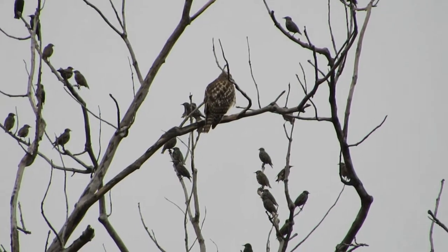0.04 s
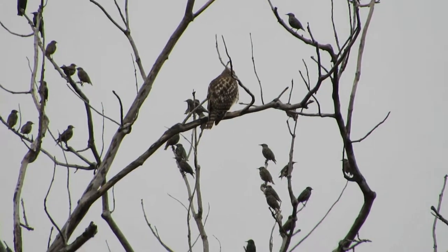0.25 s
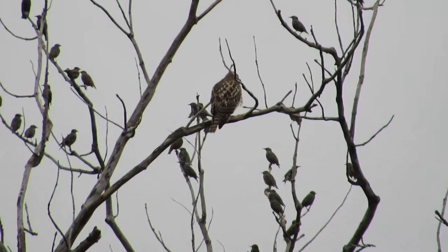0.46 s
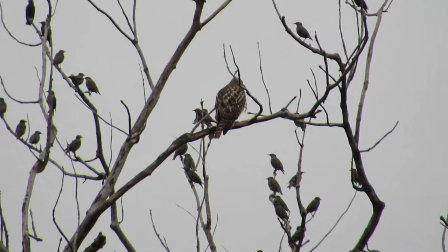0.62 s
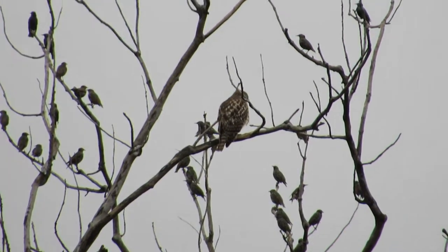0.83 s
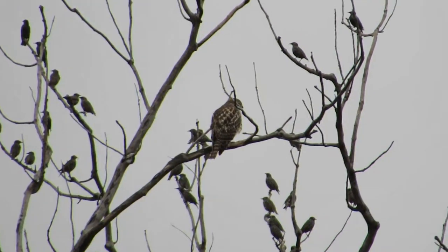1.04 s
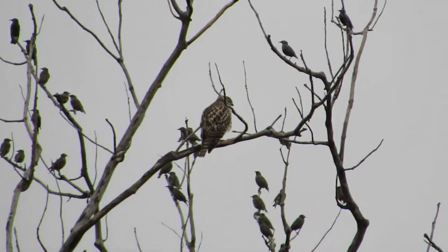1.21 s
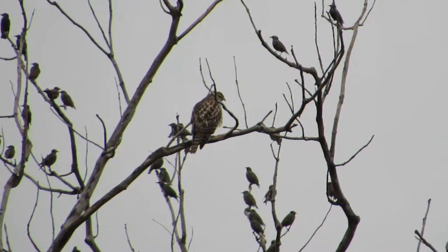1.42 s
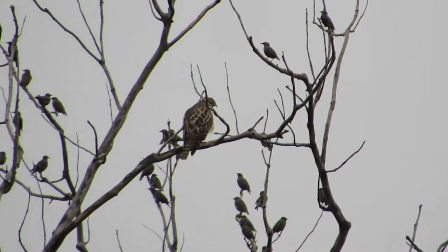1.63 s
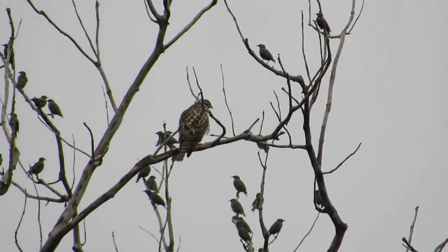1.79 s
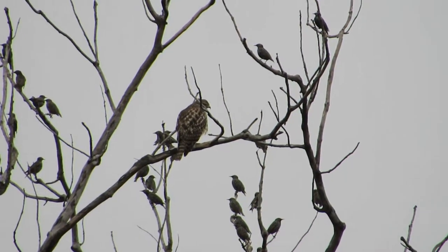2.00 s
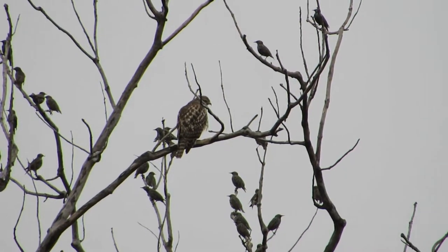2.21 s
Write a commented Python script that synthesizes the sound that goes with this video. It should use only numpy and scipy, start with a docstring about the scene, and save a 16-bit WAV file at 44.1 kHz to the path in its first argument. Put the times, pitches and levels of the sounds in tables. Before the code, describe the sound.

A hawk screams once, hoarse and falling in pitch, from a bare tree outdoors. Before the call, a louder gust of wind rumbles and thumps on the microphone, then dies down. A soft hiss runs underneath.

```python
"""A hawk's scream after a gust

Over a steady outdoor hiss and faint tones, a gust buffets the microphone, driving the two channels in
opposite directions; a limiter ducks the hiss and lets it slowly back up. A small bird peeps once.
Then a hawk in a bare tree gives one hoarse scream, a harmonic tone that leaps up, holds, sags and
breaks into squeaks. The trees scatter it back, and a faint tick follows."""
import sys
import numpy as np
from scipy import signal
from scipy.io import wavfile
from scipy.ndimage import uniform_filter1d

SR = 44100
rng = np.random.default_rng(int(sys.argv[2]) if len(sys.argv) > 2 else 0)


def master_out(mix):
    """Clip the mix to full scale and print it as 16-bit PCM to the path in sys.argv[1]."""
    frames = np.transpose(np.atleast_2d(mix))
    ceiling = np.clip(frames, -1, 1)
    pcm = np.round(ceiling * 32767).astype(np.int16)
    wavfile.write(sys.argv[1], SR, pcm)


N = 103635
TIME = np.arange(N) / SR


def from_db(db):
    """Amplitude grows tenfold for every 20 dB."""
    return 10 ** (np.asarray(db) / 20)


def unit_rms(x):
    """Dividing by the root mean square gives unit power."""
    return x / np.sqrt(np.mean(x ** 2) + 1e-20)


def curves(rows, outside=None):
    """Linear interpolation in time, one curve for each column after the first."""
    times, *columns = np.transpose(rows)
    return [np.interp(TIME, times, column, outside, outside) for column in columns]


def bell(centre_s, width_s):
    """A Gaussian envelope of height 1, whose width is its standard deviation."""
    return np.exp(-((TIME - centre_s) / width_s) ** 2 / 2)


def filtered(x, hz, kind):
    """A second-order Butterworth filter, maximally flat in its passband."""
    sections = signal.butter(2, np.clip(hz, 10, .45 * SR), kind, fs=SR, output="sos")
    return signal.sosfilt(sections, x)


def drift(rate_hz):
    """Low-passed noise gives smooth random motion of unit power."""
    pole = np.exp(-2 * np.pi * rate_hz / SR)
    return unit_rms(signal.lfilter([1], [1, -2 * pole, pole * pole], rng.standard_normal(N + SR))[SR:])


def coloured(hz, db, flicker_db=0):
    """Spectral shaping: third-octave noise bands, each free to flicker, summed to unit power."""
    out, edges = 0, 18 * 2 ** (np.arange(31) / 3)
    white = rng.standard_normal((2, N + SR // 4))
    for k, band in enumerate(zip(edges, edges[1:])):
        band_db = np.interp(np.mean(np.log(band)), np.log(hz), db) + flicker_db * drift(11)
        out = out + filtered(white[k % 2], band, "band")[-N:] * from_db(band_db)
    return unit_rms(out)


# Outdoor hiss. Each row: frequency in Hz, relative density in dB of the mid signal, then of the side.
HISS_SPECTRA = [(150, 5.5, 9.5), (316, 4.5, 7), (540, 0.5, 4), (735, 7.5, 2.5), (1024, 1.5, -1.5),
                (2050, -2.5, -8), (3080, 1.5, -10), (5240, -1.5, -13), (7300, -1, -10), (8850, -9.5, -15.5),
                (12000, -6, -10.5), (14260, -22, -30)]


def hiss(pan_db=1):
    """The sum and difference of independent noises make a wide hiss, a little stronger on the left."""
    hz, mid_db, side_db = np.transpose(HISS_SPECTRA)
    mid = from_db(-47) * coloured(hz, mid_db, flicker_db=1.36)
    side = from_db(-45) * coloured(hz, side_db, flicker_db=1.36)
    return np.array([(mid + side) * from_db(pan_db / 2), (mid - side) * from_db(-pan_db / 2)])


def narrowband(phase, spread_hz):
    """Random modulation in quadrature spreads a tone into a narrow band of noise."""
    return drift(spread_hz) * np.sin(phase) + drift(spread_hz) * np.cos(phase)


# Faint background tones. Each row: frequency in Hz, level in dB.
DRONE_TONES = [(597, -67.5), (713, -63), (835, -74.5)]


def drone():
    """Very narrow noise bands are heard as wavering tones, independent in each channel."""
    out = np.zeros((2, N))
    for channel in out:
        for hz, db in DRONE_TONES:
            channel += from_db(db) * narrowband(2 * np.pi * hz * TIME, spread_hz=17)
    return out


# Strength of the gust. Each row: time in seconds, level in dB before dulling.
GUST_LEVEL = [(0, -44.5), (.11, -28.5), (.18, -43), (.255, -16.5), (.31, -22.5), (.41, -17.5), (.46, -14.5),
              (.54, -15.5), (.63, -19.5), (.79, -17), (.9, -18.5), (.97, -22), (1.03, -17.5), (1.12, -19.5),
              (1.25, -18), (1.33, -25.5), (1.55, -32), (1.65, -38.5), (1.74, -44), (1.83, -32),
              (1.95, -38.5), (2.35, -41.5)]
# Wind rumble. Each row: frequency in Hz, relative spectral density in dB.
WIND_SPECTRUM = [(20, -6.5), (40, 3), (75, 2), (110, -2.5), (160, -13), (240, -37), (420, -71),
                 (700, -70.5)]


def wind(dull_hz=88, full_gust_db=-17):
    """Turbulence on the microphone rumbles mostly in antiphase; light air is duller than a full gust."""
    gust_db, = curves(GUST_LEVEL)
    bright = np.clip(from_db(gust_db - full_gust_db) ** 2, 0, 1)
    flow = np.array([coloured(*np.transpose(WIND_SPECTRUM)) for _ in range(2)])
    flow /= np.sqrt(uniform_filter1d(flow ** 2, size=3000, axis=1))  # even out chance swells
    side, mid = from_db(gust_db) * (bright * flow + (1 - bright) * filtered(flow, dull_hz, "low"))
    return np.array([side, -side]) + from_db(-11.5) * mid


# Eddies striking the microphone. Each row: centre in seconds, peak in dB,
# time from centre to peak in seconds, left minus right in dB.
EDDIES = [(.273, -3.5, .0022, 3.5), (0.425, -8.5, 0.0013, -3), (0.4466, -2, 0.0026, -3.5),
          (0.4684, -2, 0.0016, -2.5), (.489, -4.5, .0022, -2.5), (0.513, -6.5, 0.0025, 0.5),
          (0.5285, 1, 0.0018, 2.5), (0.577, -5, .0024, 4), (0.652, -10.5, .0016, -2),
          (0.676, -16, 0.0012, -2), (0.729, -8, 0.0032, -2.5), (0.75, -18.5, 0.0027, -4),
          (0.805, 1, 0.0019, -2), (0.828, -7, 0.0036, -5), (0.849, -14, 0.0015, -2.5),
          (0.908, -11.5, 0.0033, -4.5), (1.008, -14, 0.004, -5.5), (1.032, -8.5, 0.0031, -4),
          (1.085, -9, 0.0027, -1.5), (1.147, -10, 0.0023, -3.5), (1.191, -6, 0.0024, -2.5),
          (1.246, -8.5, .0019, -3), (1.264, -12, 0.0022, -2.5)]


def buffets():
    """Each eddy is a bipolar pressure pulse, opposite in the two channels and stronger in one."""
    out = 0
    for centre_s, db, half_s, pan_db in EDDIES:
        offset = (TIME - centre_s) / half_s
        pulse = offset * np.exp((1 - offset ** 2) / 2)
        out = out + np.outer([-from_db(db + pan_db / 2), from_db(db - pan_db / 2)], pulse)
    return out


def peep(centre_s=.485, hz=5250):
    """A small bird's peep is a pure tone under a brief Gaussian envelope."""
    return from_db(-48) * bell(centre_s, width_s=.0078) * np.sin(2 * np.pi * hz * (TIME - centre_s))


# Rates of the random motion in the hawk's pitch (jitter) and level (shimmer).
JITTER_HZ, SHIMMER_HZ = 163, 96


def flutter(hoarse, hz=300, depth=.45, wander_rad=1.5):
    """Amplitude modulation with a wandering phase makes a hoarse voice beat quickly and unevenly."""
    return 1 + depth * hoarse * np.sin(2 * np.pi * hz * TIME + wander_rad * drift(SHIMMER_HZ))


# Hoarse breath. Each row: time in seconds, gain in dB shared by throat rasp and beak air.
BREATH_GAIN = [(1.648, -76), (1.678, -53), (1.76, -52), (1.83, -55), (1.92, -52), (2.03, -56), (2.085, -53),
               (2.115, -52), (2.13, -55), (2.16, -85)]
# Air through the open beak. Each row: frequency in Hz, relative spectral density in dB.
BEAK_SPECTRUM = [(600, -50), (1600, -15), (2150, -4), (2800, -12), (3500, 4), (4500, -16), (5400, -1),
                 (7000, -11), (11000, -27), (16000, -40)]


def breath(phase, throat_hz=(1570, 2750)):
    """Throat resonance filters a rasp around the second harmonic, while air hisses through the beak."""
    rasp = filtered(narrowband(2 * phase, spread_hz=390), throat_hz, "band")
    air = from_db(-1.5) * coloured(*np.transpose(BEAK_SPECTRUM))
    return from_db(curves(BREATH_GAIN, -np.inf)[0]) * (rasp + air)


# Pitch of the scream. Each row: time in seconds, fundamental in Hz.
SCREAM_PITCH = [(1.655, 922.5), (1.68, 1205), (1.692, 1268), (1.72, 1380), (1.745, 1406), (1.795, 1402),
                (1.85, 1336), (1.94, 1289), (1.98, 1209), (2.015, 1137), (2.05, 1067), (2.095, 954),
                (2.12, 1031)]
# Rough attack, clean hold, rough fall. Each row: time in seconds, hoarseness from 0 to 1.
HOARSENESS = [(1.66, 0.99), (1.705, 0.86), (1.725, 0.45), (1.835, 0.01), (1.87, 0.8), (1.94, 0.9),
              (1.975, 0.4), (2.015, 0.7), (2.055, 0.1), (2.1, 0.96)]
# The harmonic that carries the scream. Each row: time in seconds, level in dB.
SECOND_HARMONIC = [(1.65, -69), (1.668, -48), (1.683, -44), (1.694, -51), (1.722, -33), (1.755, -46),
                   (1.768, -39), (1.792, -42.5), (1.812, -36), (1.843, -37), (1.858, -45.5), (1.945, -48.5),
                   (1.968, -33), (1.984, -34), (2.009, -55), (2.053, -34.5), (2.076, -43), (2.085, -60)]
# The weaker harmonics. Each row: time in seconds, levels in dB of harmonics 1, 3, 4 and 5.
WEAK_HARMONICS = [(1.655, -72, -66, -70, -80), (1.679, -58, -39.5, -56, -60), (1.694, -58, -39.5, -58, -51),
                  (1.709, -57, -58, -66, -48), (1.725, -52, -46, -66, -57), (1.75, -48, -50, -68, -63),
                  (1.785, -47, -50, -66, -59), (1.85, -57, -64, -66, -55.5), (1.93, -56, -66, -67, -61),
                  (1.99, -57, -62, -66, -72), (2.022, -60, -62, -49, -74), (2.05, -61, -57, -64, -74),
                  (2.09, -72, -68, -78, -82)]


def scream(jitter=.00844, shimmer_db=4):
    """A nearly periodic voice gives a harmonic series, roughened by jitter, shimmer and flutter."""
    pitch, = curves(SCREAM_PITCH)
    hoarse, = curves(HOARSENESS)
    phase = 2 * np.pi * np.cumsum(pitch * (1 + jitter * hoarse * drift(JITTER_HZ))) / SR
    first, *upper = curves(WEAK_HARMONICS, -np.inf)
    second, = curves(SECOND_HARMONIC, -np.inf)
    tone = 0
    for k, db in enumerate([first, second, *upper], start=1):
        tone = tone + from_db(db + shimmer_db * hoarse * drift(SHIMMER_HZ)) * np.sin(k * phase)
    # Brief period doubling adds lines at 1.5 and 2.5 times the fundamental.
    doubling = from_db(-56) * bell(centre_s=2, width_s=.014) * drift(SHIMMER_HZ)
    tone += doubling * 2 * np.cos(phase / 2) * np.sin(2 * phase)
    return np.sqrt(2) * tone * flutter(hoarse) + breath(phase)


def tree_echoes(call, delay_s=.028, t60_s=.5, paths_per_s=600, width=.7):
    """Scattering from trunks and ground returns many dull reflections that decay exponentially."""
    age = np.arange(SR) / SR
    paths = rng.standard_normal((2, SR)) * (rng.random((2, SR)) < paths_per_s / SR)
    paths *= (age > delay_s) * from_db(-60 * age / t60_s)
    echoes = [signal.fftconvolve(call, unit_rms(path) / np.sqrt(SR))[:N] for path in paths]
    mid, side = filtered(echoes, hz=2900, kind="low")
    return from_db(-12) * np.array([mid + width * side, mid - width * side])


# Squeaks that end the scream. Each row: centre in seconds, peak in dB before flutter, frequency in Hz.
SQUEAKS = [(2.097, -44, 1800), (2.108, -43.5, 2350), (2.118, -42, 2020)]


def voice_breaks(jitter=.0507):
    """The voice breaks into short tone bursts that rattle with frequency and amplitude modulation."""
    warped_time = np.cumsum(1 + jitter * drift(JITTER_HZ)) / SR
    out = 0
    for centre_s, db, hz in SQUEAKS:
        out = out + from_db(db) * bell(centre_s, width_s=.0036) * np.sin(2 * np.pi * hz * warped_time)
    return out * flutter(hoarse=1)


def hawk(left_db=-.2, right_lag_s=5e-6):
    """Nearly equal level and arrival time in both channels place the call ahead, amid its echoes."""
    call = scream() + voice_breaks()
    direct = np.array([call * from_db(left_db), np.interp(TIME - right_lag_s, TIME, call)])
    return direct + tree_echoes(call)


def tick(start_s=2.153, decay_s=.001):
    """A noise burst with a fast exponential decay is heard as one faint, dry tick."""
    age = TIME - start_s
    burst = from_db(-30.5) * rng.standard_normal(N) * (age > 0) * np.exp(-abs(age) / decay_s)
    return filtered(burst, hz=(2200, 6500), kind="band")


def scene():
    """Hawk, wind and background add by superposition."""
    return hawk() + wind() + buffets() + hiss() + drone() + peep() + tick()


def limiter(x, threshold_db=-1.5, attack_s=.016, release_db_per_s=8, ceiling=1.86):
    """Gain reduction: peaks pull the gain down, it creeps back, and saturation rounds the overshoot."""
    peak_db = 20 * np.log10(np.abs(x).max(axis=0) + 1e-9)
    excess_db = np.maximum(peak_db - threshold_db, 0)
    release_db = release_db_per_s * TIME
    held_db = np.maximum.accumulate(excess_db + release_db) - release_db
    pole = np.exp(-1 / (attack_s * SR))
    reduction_db = signal.lfilter([1 - pole], [1, -pole], held_db)
    return ceiling * np.tanh(x * from_db(-reduction_db) / ceiling)


# Narrow dips in the recorder's response. Each row: centre in Hz, width in Hz.
RESPONSE_NOTCHES = [(3950, 220), (7880, 42)]


def record(dry, cutoff_hz=14250):
    """Limiting, then linear filtering by two narrow notches and a steep elliptic low-pass."""
    out = limiter(dry)
    for hz, width_hz in RESPONSE_NOTCHES:
        out = signal.lfilter(*signal.iirnotch(hz, hz / width_hz, fs=SR), out)
    return signal.sosfilt(signal.ellip(10, .2, 80, cutoff_hz, fs=SR, output="sos"), out)


dry = scene()
out = record(dry)
master_out(out)
```